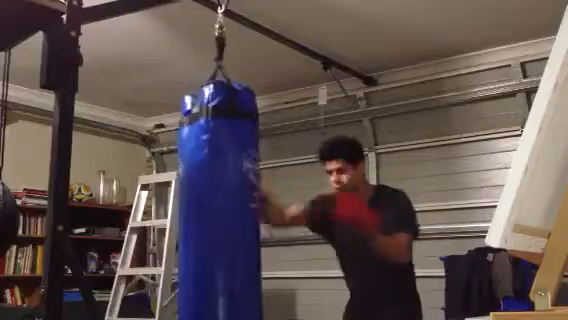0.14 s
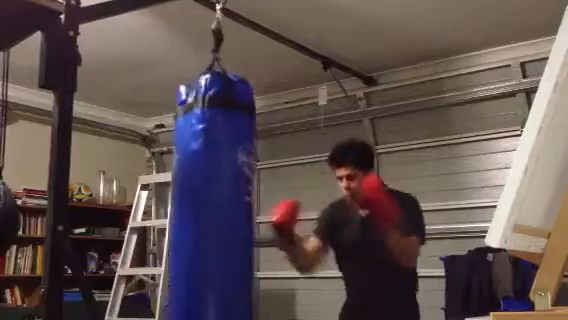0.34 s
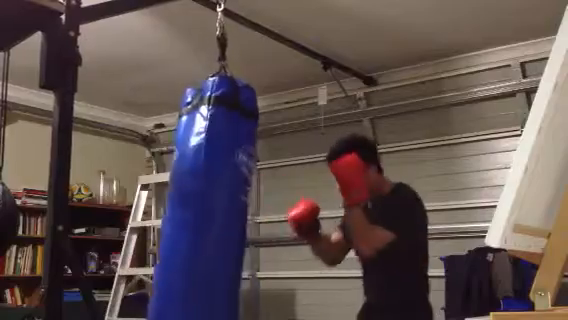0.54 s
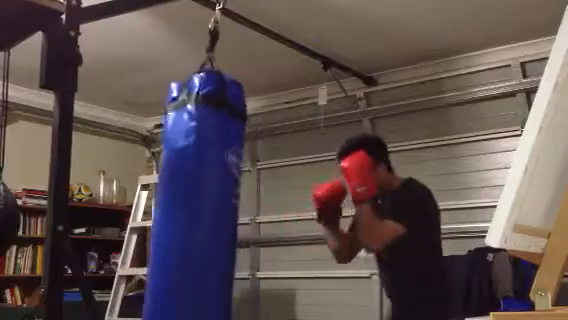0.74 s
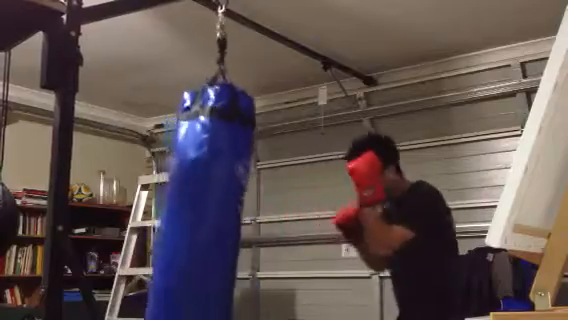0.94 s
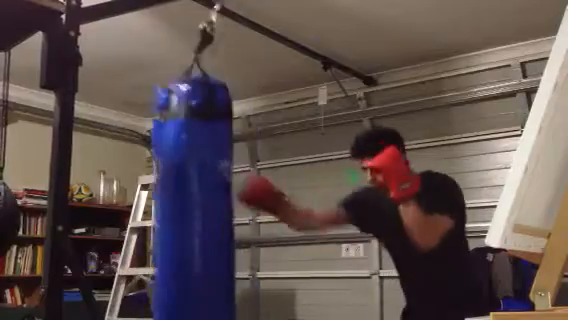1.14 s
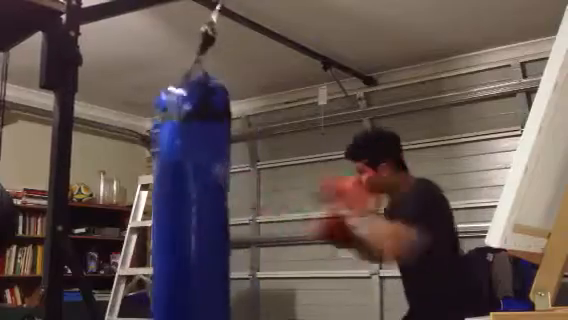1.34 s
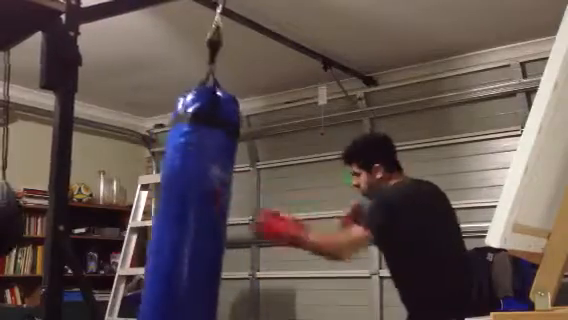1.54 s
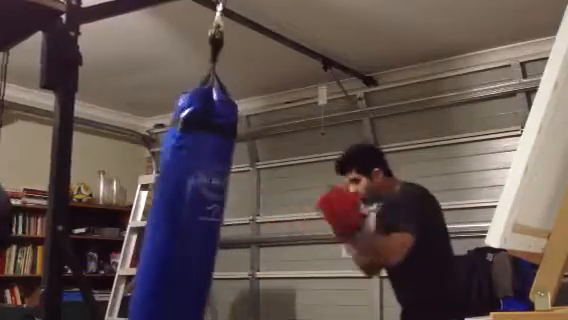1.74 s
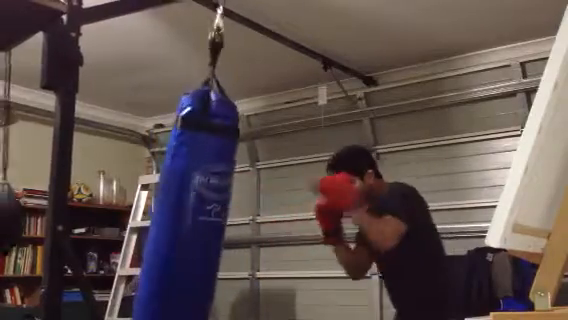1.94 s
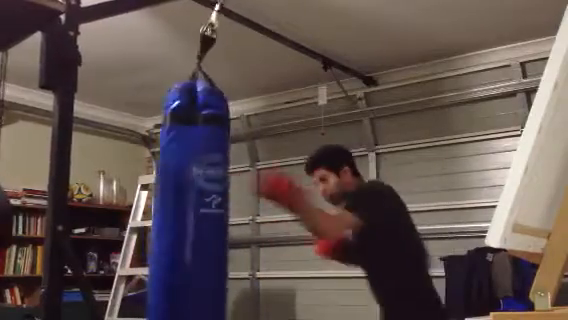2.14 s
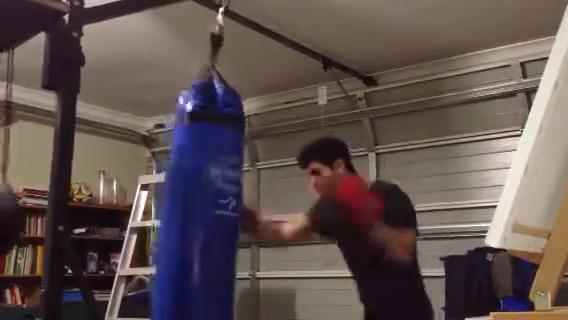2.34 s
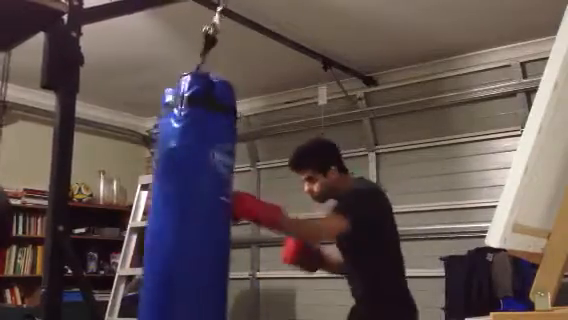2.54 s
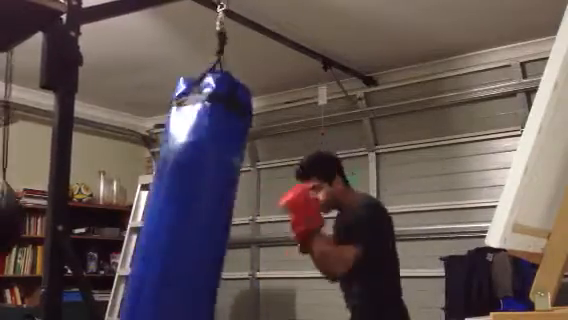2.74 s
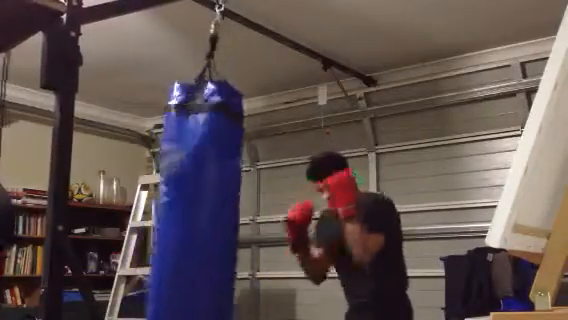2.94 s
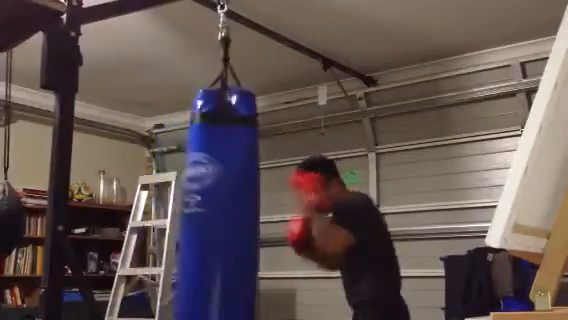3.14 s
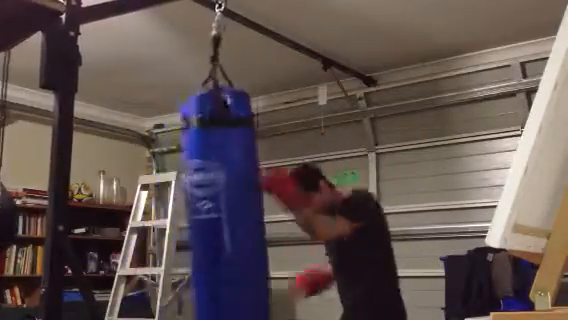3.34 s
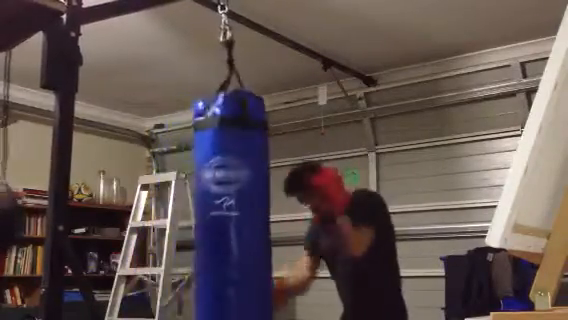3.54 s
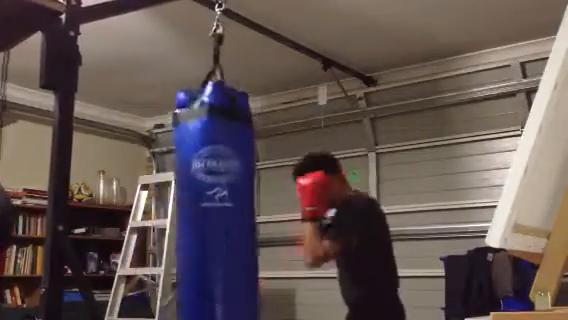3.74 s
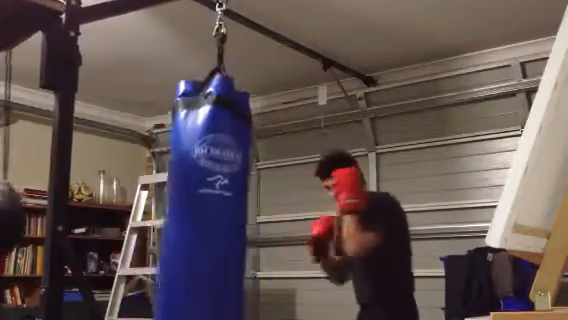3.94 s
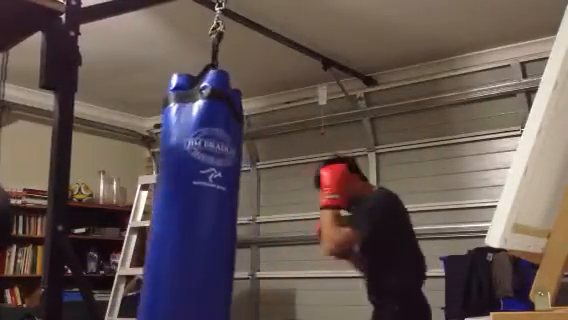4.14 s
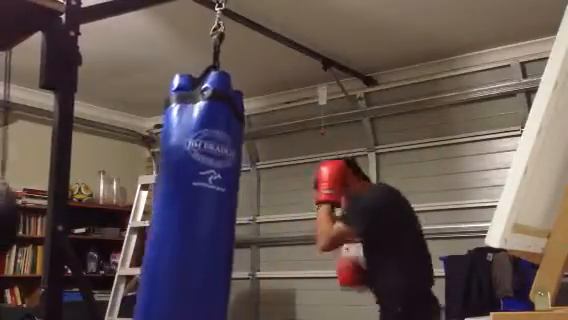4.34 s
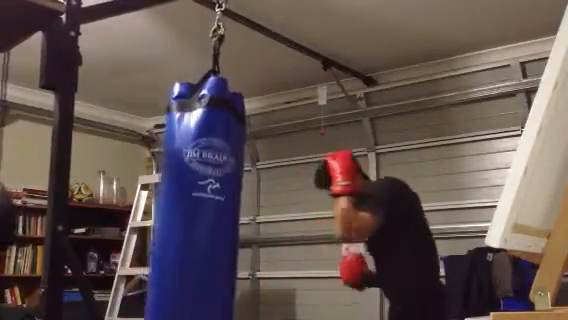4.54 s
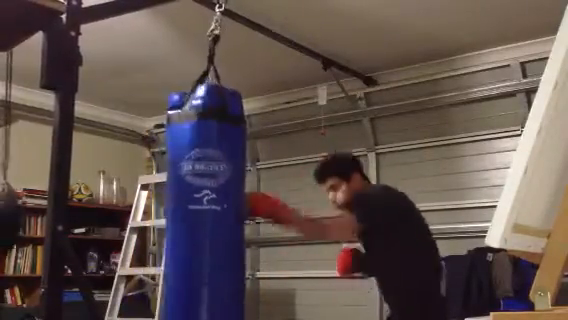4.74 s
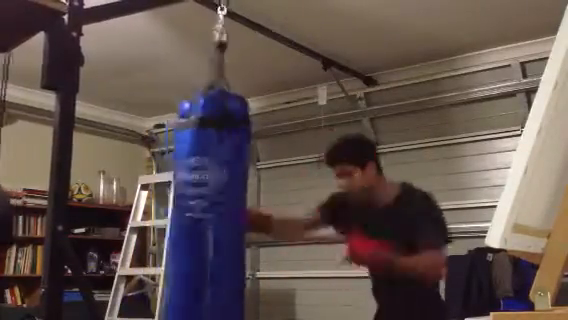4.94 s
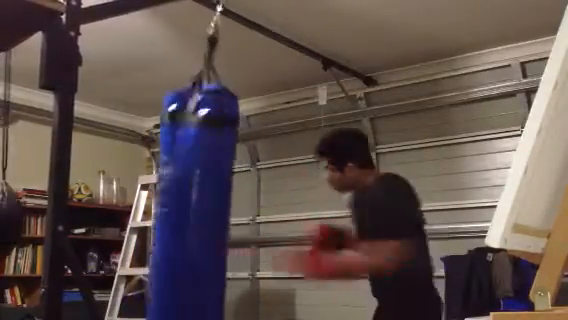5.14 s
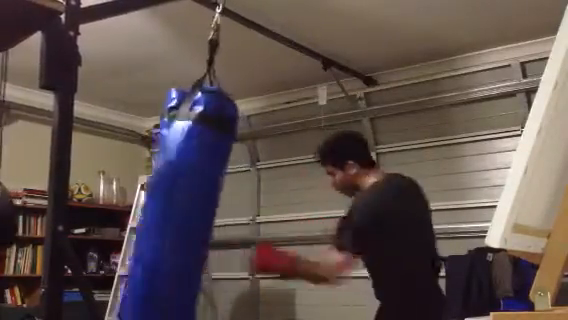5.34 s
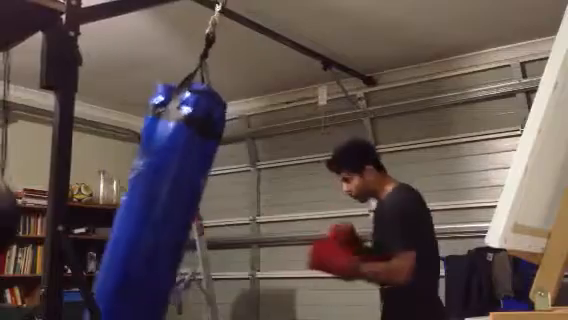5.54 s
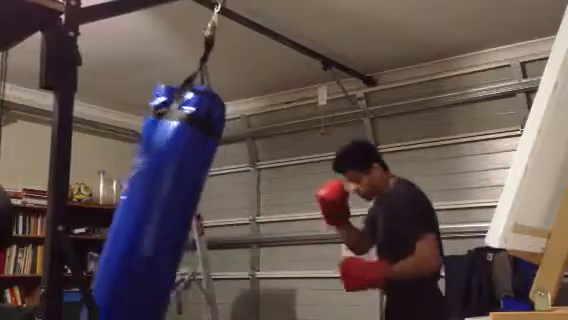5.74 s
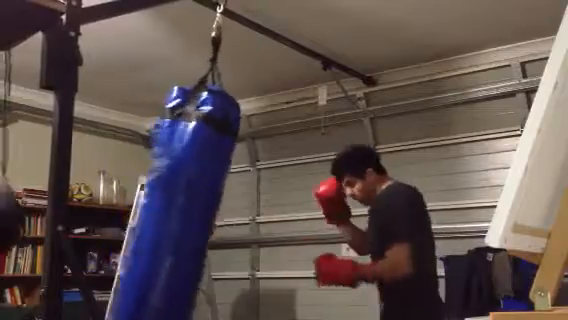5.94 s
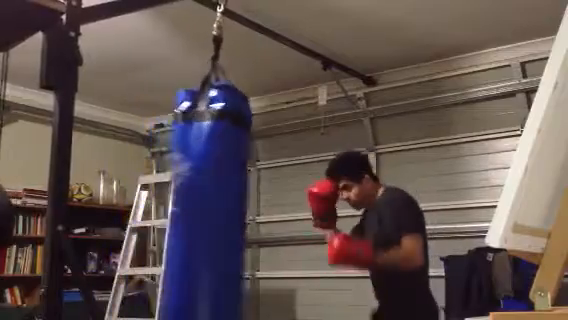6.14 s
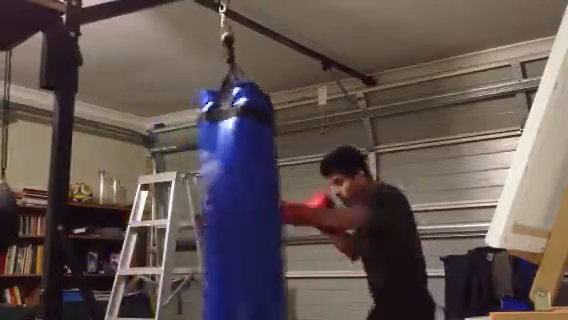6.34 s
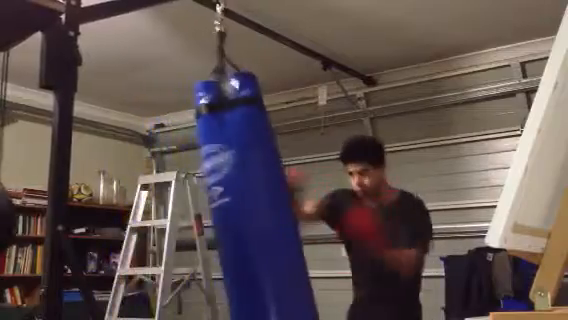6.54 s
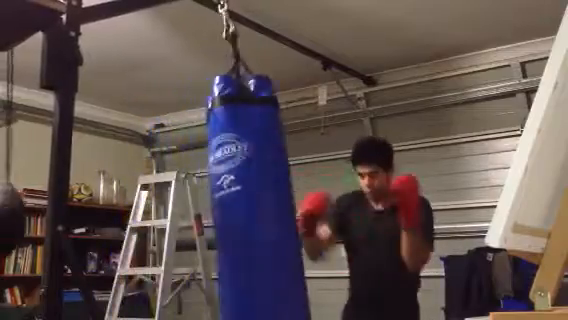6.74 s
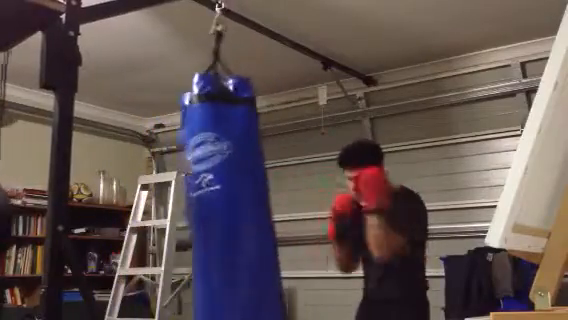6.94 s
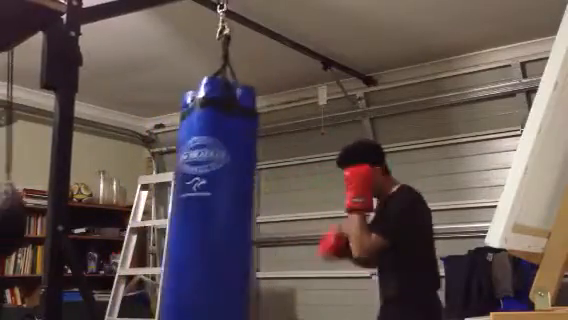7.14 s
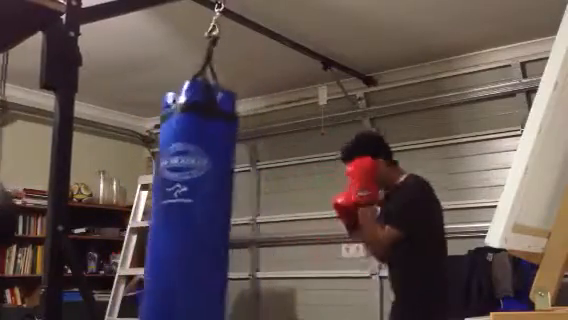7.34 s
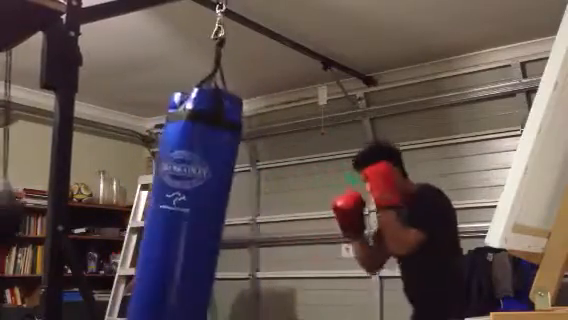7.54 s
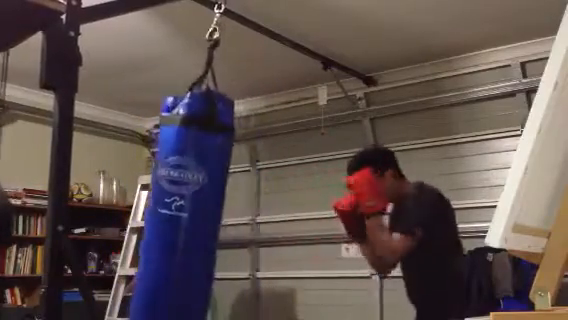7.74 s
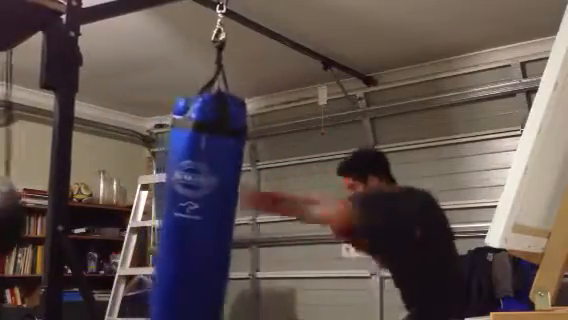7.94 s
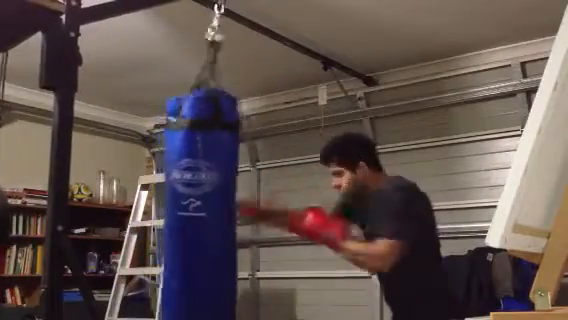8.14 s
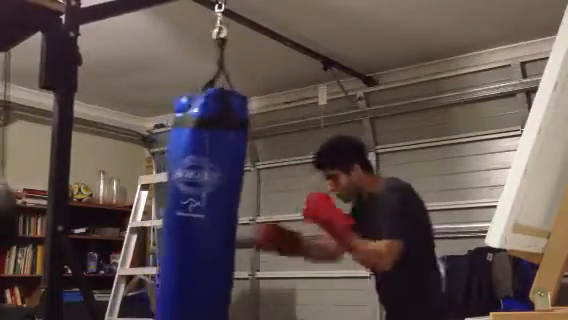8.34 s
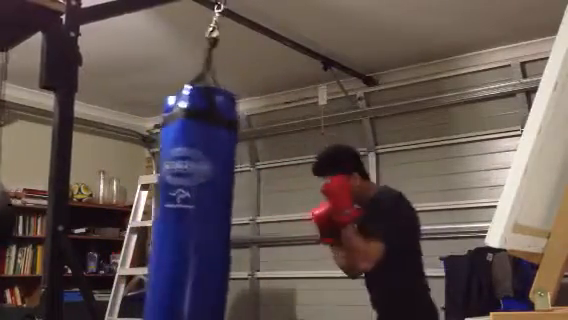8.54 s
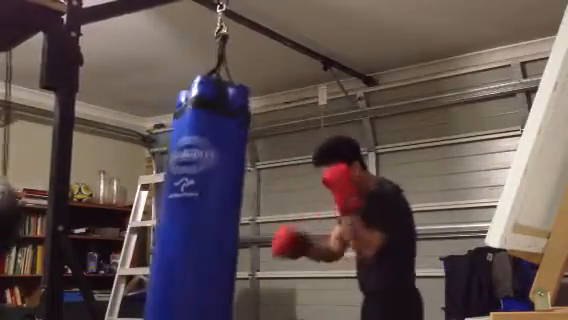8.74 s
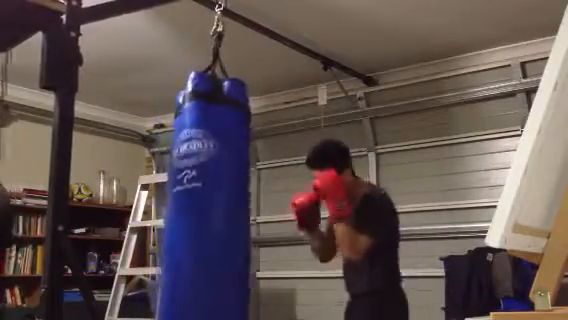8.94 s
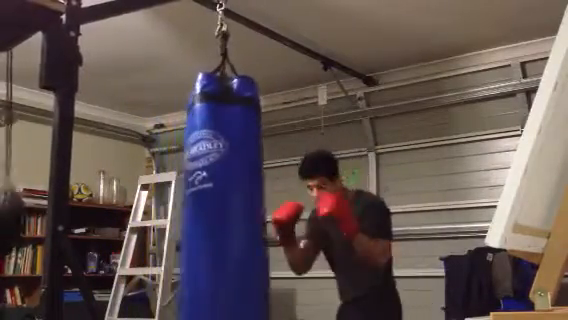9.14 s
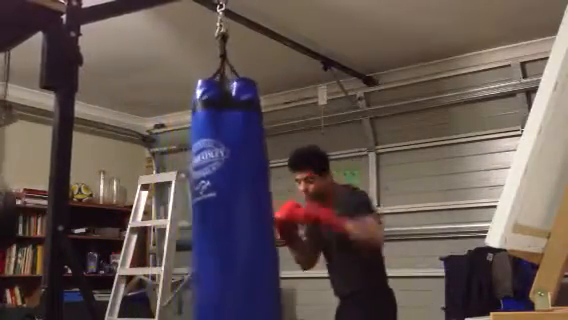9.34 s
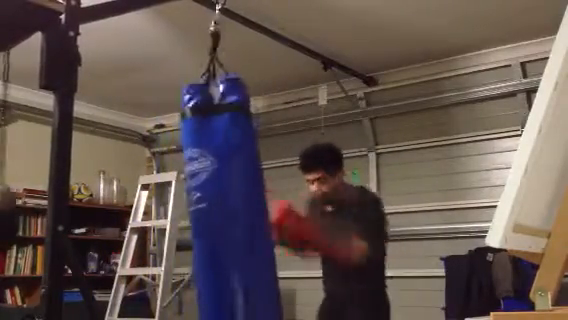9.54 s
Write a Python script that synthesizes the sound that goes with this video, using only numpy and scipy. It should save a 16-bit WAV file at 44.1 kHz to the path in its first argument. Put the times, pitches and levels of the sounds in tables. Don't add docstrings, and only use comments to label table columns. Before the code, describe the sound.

Padded gloves thud into a heavy hanging bag in short flurries, its steel chain jerking and clattering, shoes shuffling between blows in a hard-walled garage.

```python
import sys
import numpy as np
from scipy import signal
from scipy.fft import rfft, irfft
from scipy.io import wavfile
from scipy.ndimage import uniform_filter1d

SR = 44100
rng = np.random.default_rng(int(sys.argv[2]) if len(sys.argv) > 2 else 0)


def transcribe(u):
    v = np.clip(np.atleast_2d(u).T, -1, 1)
    q = np.round(v * 32767).astype(np.int16)
    wavfile.write(sys.argv[1], SR, q)


def rack_gain(trim_db):
    fader = np.asarray(trim_db, float)
    return 10 ** (fader / 20)


N = 422919
SIZE = 2 ** 15
HZ, T = np.fft.rfftfreq(SIZE, 1 / SR), np.arange(SIZE) / SR

# pitch_hz, level_db
MIC = [(25, -26), (50, -21), (100, -0.5), (170, 12), (480, 0.5), (1000, 3.5), (2300, 1.5), (4900, 6.5),
       (5800, 3), (8500, 3), (10500, -2), (13000, 1), (15200, -6.5), (15600, -37.5)]
# pitch_hz, t60_s
WALLS = [(100, 0.17), (300, 0.59), (1000, 0.67), (3000, 0.54), (7000, 0.44), (14000, 0.28)]
# pitch_hz, density_db (per Hz)
AIR = [(24, -82.5), (40, -53), (64, -36), (85, -19), (118, -16.5), (176, -0.5), (363, -5.5), (433, -20),
       (810, -18), (2150, -23.5), (4130, -23.5), (5870, -23.5), (14800, -33), (16000, -55.5)]
# time_s, rustle_db (over the still room)
MOVE = [(0, 41), (.45, 25), (.77, 13.5), (1.1, 25), (3.0, 30), (3.8, 14.5), (4.25, 7), (4.45, 28), (4.6, 1),
        (4.8, 38), (5.6, 22.5), (6.28, 10), (6.9, 28), (7.5, 20.5), (7.95, 16.5), (8.57, 23.5), (9.3, 13.5),
        (9.59, 42)]
# start_s, pitch_hz, level_db
SING = [
    (.2, 1351, -56),
    (.2, 1930, -56),
    (.2, 2420, -56),
    (.65, 2460, -63),
    (1.75, 2200, -47),
    (2.83, 1340, -53),
    (2.83, 2218, -55),
    (5.29, 4160, -49),
    (6.64, 1344, -50),
    (8.22, 1330, -55),
]
# start_s, pitch_hz, level_db
CLINK = [(1.26, 2148, -26), (4.83, 3650, -44), (4.83, 918, -40), (5.08, 2920, -35), (5.58, 2660, -50.5),
         (6.236, 2250, -45), (6.236, 2090, -41), (6.236, 2440, -32.5), (6.237, 2680, -38.5),
         (6.236, 3060, -54), (6.236, 3660, -48), (6.236, 4700, -51), (6.235, 317, -47), (5.58, 3940, -53),
         (5.58, 5950, -60), (6.64, 4240, -33.5), (6.799, 1100, -59), (4.46, 934, -56), (8.327, 1028, -43)]
# start_s, pitch_hz, level_db
JANGLE = [(0.031, 3290, -38.5), (.202, 4760, -40.5), (1.254, 4380, -24.5), (1.5, 3630, -34),
          (1.746, 4200, -24), (1.84, 5210, -32.5), (2.161, 1316, -35.5), (2.359, 3940, -24),
          (2.46, 4080, -30), (2.701, 4470, -34), (4.2, 1104, -45.5), (5.081, 5080, -27), (5.58, 4150, -53),
          (6.235, 2440, -37), (8.02, 1000, -38), (9.31, 1384, -50.5), (9.049, 594, -52)]
# start_s, body_db, scuff_db, slide_spread_s
SHOES = [(0.4312, -41.5, -57.5, 0.035), (0.6527, -38, -51, 0.0033), (0.747, -46.5, -51.5, 0.0042),
         (0.899, -43.5, -69, 0.0034), (3.751, -66, -48.5, .011), (3.9397, -49.5, -55.5, 0.0097),
         (4.0367, -60, -58.5, .015), (4.2077, -44.5, -51.5, 0.0045), (4.4594, -43, -50, 0.034),
         (4.6194, -71, -53, .0077), (5.5742, -38, -39.5, 0.0053), (5.7471, -40.5, -51, 0.0067),
         (5.8544, -48.5, -49, .0063), (6.052, -42, -54, 0.0033), (6.9816, -70, -48.5, .012),
         (7.208, -48, -45, 0.0033), (7.4297, -46, -50, 0.01), (8.7815, -40, -47.5, .012),
         (9.1196, -75, -54.5, .011), (9.2759, -54, -49, .036)]
# middle_s, pitch_hz, level_db, length_s
SQUEAK = [(0.439, 1076, -40.5, 0.042), (1.365, 1086, -28.5, 0.03), (1.715, 1220, -40.5, 0.048),
          (2.795, 1096, -32, 0.036), (5.091, 947, -20, 0.045), (5.098, 696, -23, 0.036),
          (5.164, 1070, -27.5, 0.042), (6.496, 1097, -37, 0.085), (7.002, 1106, -48, 0.074),
          (8.351, 1058, -33, .04), (8.35, 694, -31, 0.029), (8.44, 1390, -47, .04), (4.676, 315, -55, 0.06)]
# start_s, body_db, clatter_db, sizzle_db, rattle_spread_s
CHAIN = [(0.218, -27, -31.5, -32, 0.0069), (1.2498, -19, -12, -12, 0.0072),
         (1.498, -24.5, -24, -20, 0.0068), (1.7424, -19, -11, -7, 0.014), (1.8377, -26, -17, -17.5, .004),
         (2.3549, -17.5, -13, -10.5, 0.0083), (2.4205, -26, -17, -11.5, .006),
         (2.4558, -19, -11.5, -10, 0.013), (2.6981, -27, -27.5, -16, 0.0038),
         (2.823, -22, -13.5, -7, .0043), (3.4764, -27, -24, -21, .0022), (4.8274, -38, -35.5, -29.5, 0.014),
         (5.006, -45, -20.5, -17, 0.0077), (5.0661, -13, -16, -32, 0.014),
         (5.1014, -33, -16.5, -12.5, 0.0086), (5.1311, -54, -18, -18.5, 0.0015),
         (5.2756, -26, -21, -14, 0.0094), (6.235, -34.5, -36.5, -41.5, 0.0014),
         (6.52, -27.5, -40.5, -46, 0.0017), (6.5696, -31, -32, -35.5, 0.022),
         (6.6305, -27, -18.5, -12, 0.0092), (8.1044, -28.5, -19.5, -12.5, 0.0078),
         (8.2401, -42, -27.5, -21, .004), (8.3232, -28.5, -39, -47, 0.0012)]
# pitch_hz, level_db, t60_s
LINKS = [(1150, -5, .015), (2150, -3, .015), (2850, -3, .015), (3600, 0, .012), (4300, 0, .012),
         (5000, 0, .012), (6500, -1, .012), (7400, -1, .012), (9200, -1, .012), (12000, -2, .012)]
# centre_hz, width_hz
CHAIN_HZ = [(450, 400), (1400, 1300), (3900, 3500), (10000, 8000)]
# start_s, thud_db, body_db, slap_db, crack_db (over the slap; flat hits crack, glancing do not)
PUNCH = [(.001, -28, -37, -31, -3), (.2, -22.5, -30.5, -35, 7), (1.1275, -22.5, -26.5, -29.5, 9.5),
         (1.4495, -21.5, -30.5, -27, 14.5), (2.1009, -29.5, -29.5, -31, 8.5), (2.324, -21, -26.5, -24.5, 2),
         (2.5204, -25, -25.5, -30, 5), (3.2799, -33, -36.5, -45, 2), (3.4587, -17, -22, -25, 6.5),
         (4.7387, -27.5, -30, -33.5, 5.5), (4.974, -18.5, -23, -22.5, 4.5), (5.252, -20, -28, -27.5, 17.5),
         (6.3671, -32, -31.5, -41.5, 7.5), (6.5982, -25, -27, -26.5, 0), (8.0107, -30, -27, -32.5, 11),
         (8.2087, -22.5, -24.5, -29.5, 12.5), (9.4569, -24.5, -26.5, -31.5, 5.5)]
# pitch_hz, level_db, t60_s
BAG = [(97.6, -20.5, 0.85), (146.4, -13, 0.16), (197.8, -3.5, 0.22), (233.8, -7, 0.25), (269.2, -9.5, 0.38),
       (308, -12.5, .2)]
# centre_hz, width_hz
PUNCH_HZ = [(200, 230), (900, 1000), (3500, 4000), (10000, 8000)]


def unit(x):
    return x / np.sqrt(np.mean(x ** 2, axis=-1, keepdims=True) + 1e-20)


def along(points, hz):
    f, v = np.transpose(points)
    return np.interp(np.log(hz + 1), np.log(f + 1), v)


def causal(db):
    cepstrum = irfft(db * np.log(10) / 20)
    cepstrum[..., 1:SIZE // 2] *= 2
    cepstrum[..., SIZE // 2 + 1:] = 0
    return np.exp(rfft(cepstrum))


def colour(levels, bands, bass_db):
    centre, width = np.transpose(bands)
    doubled = [0, 0, 1, 2, 3]
    density = np.transpose(levels)[:, doubled] - 10 * np.log10(width[doubled] / 1000)
    density = density + [bass_db, 0, 0, 0, 0]
    points_hz = np.r_[centre[0] / 4, centre]
    return causal(np.array([along(np.c_[points_hz, d], HZ) for d in density]))


def contacts(spread, spiky_db, lead):
    u = T[:SIZE // 4] / np.clip(spread, .0003, .02)
    spikes = rack_gain(spiky_db * np.minimum(rng.exponential(size=u.shape), 3))
    impacts = spikes * rng.standard_normal(u.shape)
    return rfft(unit(impacts * (u + lead) * np.exp(-u)), SIZE) / np.sqrt(SIZE / 4)


def rings(modes, count, scatter_db, detune):
    out = np.zeros((count, len(HZ)), complex)
    step = np.exp(-2j * np.pi * HZ / SR)
    for hz, db, t60 in modes:
        luck = rng.standard_normal((count, 2))
        pitch_hz = hz * (1 + detune * luck[:, :1])
        pole = np.exp(2j * np.pi * pitch_hz / SR - np.log(1000) / (t60 * SR))
        resonance = pole.imag * step / ((1 - pole * step) * (1 - pole.conj() * step))
        out += rack_gain(db + scatter_db * luck[:, 1:]) * resonance
    return out


def garage(build, wet_db, gap=0.011, clump_db=-1.5):
    hz, t, z = signal.stft(rng.standard_normal((len(build), SIZE)), SR, nperseg=256)
    lumps = clump_db * rng.standard_normal((len(build), 9, len(t)))
    lumps = lumps.repeat(15, axis=1)[:, :len(hz)]
    decay_db = 60 * t / along(WALLS, hz)[:, None]
    tail = signal.istft(z * rack_gain(lumps - decay_db), SR, nperseg=256)[1][:, :SIZE]
    late = np.clip(T - gap, 0, None) / np.clip(build, .0003, .2)
    return rack_gain(wet_db) * rfft(unit(tail * (1 - np.exp(-late)))) / np.sqrt(SIZE)


def place(rows, spectra):
    out = np.zeros(N + SIZE)
    fade = np.clip((T[-1] - T) / .2, 0, 1)
    for s, sound in zip(rows[:, 0], irfft(spectra, SIZE)):
        out[round(s * SR):][:SIZE] += sound * fade
    return out[:N]


def stir():
    hz, t, z = signal.stft(rng.standard_normal(N), SR, nperseg=512)
    field = uniform_filter1d(rng.standard_normal(z.shape), 5, axis=0)
    field = uniform_filter1d(field, 9, axis=1)
    move_db = np.interp(t, *np.transpose(MOVE))
    s, _, body_db, *_ = np.transpose(PUNCH)
    # dB per dB of movement, time to the sway's peak (s), sway over blow's body, still room
    ranges = [(0.32, 0.079, 43.5, 5.5), (0.98, 0.059, 68.5, 5), (0.53, 0.041, 63, 5.5)]
    swell = []
    for grows, peak_s, sway_db, still_db in ranges:
        u = np.clip(t[:, None] - s, 0, None) / peak_s
        sway = u * np.exp(1 - u) @ rack_gain(body_db + sway_db)
        power = rack_gain(2 * still_db) + rack_gain(2 * grows * move_db) + sway ** 2
        swell.append(10 * np.log10(power))
    gain_db = np.array([along(np.c_[[220, 1000, 6000], col], hz) for col in np.transpose(swell)]).T
    air_db = along(AIR, hz) - along(MIC, hz)
    patchy_db = np.clip(3.2 - hz / 1500, .8, 9)
    gain_db = gain_db + air_db[:, None] + patchy_db[:, None] * field / field.std()
    return rack_gain(-48.0) * signal.istft(z * rack_gain(gain_db), SR, nperseg=512)[1][:N]


def shoes():
    rows = np.array(SHOES)
    body_db, scuff_db = rows.T[1:3]
    spread = rows[:, 3:]
    scuff = contacts(spread, spiky_db=4.5, lead=0.97) + garage(0.45 * spread, wet_db=3.0)
    levels = [body_db - 9.5, body_db, scuff_db, scuff_db - 2]
    return place(rows, rack_gain(29.5) * scuff * colour(levels, PUNCH_HZ, bass_db=-5.5))


def squeaks():
    rows = np.array(SQUEAK)
    pitch_hz, level_db, length = rows[:, 1:2], rows[:, 2:3], rows[:, 3:]
    waver = unit(uniform_filter1d(rng.standard_normal((len(rows), SIZE)), 120, axis=1))
    glide = np.tanh(T / length - .4)
    phase = 2 * np.pi * np.cumsum(pitch_hz * (1 + 0.046 * waver + 0.021 * glide), axis=1) / SR
    u = 4 * T / length
    tone = rack_gain(level_db + 7) * u * np.exp(-u) * (np.sin(phase) + 0.089 * np.sin(2 * phase))
    return place(rows - length / 2, rfft(tone) * (1 + garage(length / 10, wet_db=-9)))


def beam():
    out, t = np.zeros(N + SR), np.arange(SR) / SR
    # table, width of a partial (Hz), t60 at 1 kHz (s), how t60 shortens with pitch (power)
    kinds = [(SING, 30, 2.5, .7), (CLINK, 150, .5, .15), (JANGLE, 800, .33, .05)]
    for table, blur_hz, ring_s, falls in kinds:
        for s, hz, db in table:
            t60 = ring_s * (1000 / hz) ** falls
            knots = rng.standard_normal((2, 1200))
            wander = np.interp(blur_hz * t, np.arange(1200), knots[0] + 1j * knots[1])
            beat = 14 / blur_hz + wander
            level = rack_gain(db - 60 * t / t60) * (1 - np.exp(-t / 0.0033)) * (1 - t ** 4)
            out[round(s * SR):][:SR] += level * (beat * np.exp(2j * np.pi * hz * t)).imag
    return out[:N]


def chain():
    rows = np.array(CHAIN)
    body_db, clatter_db, sizzle_db = rows.T[1:4]
    spread = rows[:, 4:]
    knocks = contacts(spread, spiky_db=4.5, lead=0.19) + garage(0.93 * spread, wet_db=2, gap=0.0029)
    steel = 1 + rack_gain(-39) * rings(LINKS, len(rows), scatter_db=3.0, detune=0.071)
    levels = [body_db - 11.5, body_db, clatter_db, sizzle_db]
    return place(rows, rack_gain(29.0) * knocks * steel * colour(levels, CHAIN_HZ, bass_db=-12.0))


def punches():
    rows = np.array(PUNCH)
    thud_db, body_db, slap_db = rows.T[1:4]
    touch = np.full((len(rows), 1), .0005)
    bright = 1j * HZ / (600 + 1j * HZ)
    bounce = 1 + 1.03 * np.exp(-2j * np.pi * HZ * 0.0041) / (1 + 1j * HZ / 8000)
    snap = contacts(touch, spiky_db=6.5, lead=.6) - rack_gain(-17.0)
    crack = rack_gain(rows[:, 4:] - 4.5) * bright * bounce * snap
    slap = crack - rack_gain(-13.0) + garage(8 * touch, wet_db=10, gap=0.0014)
    boom = -rack_gain(rows[:, 1:2] - 13.5) * rings(BAG, len(rows), scatter_db=0.9, detune=0.017)
    levels = [thud_db - 3, body_db, slap_db, slap_db + 3.4]
    sound = rack_gain(25) * slap * colour(levels, PUNCH_HZ, bass_db=0.0)
    sound = sound + boom * (2.5 + garage(touch, wet_db=-10.5))
    return place(rows + .0006, sound)


def scene():
    return (stir() + shoes() + squeaks() + beam() + chain() + punches())[None]


def top_cut(x):
    return signal.sosfilt(signal.butter(12, 16490, fs=SR, output="sos"), x)


def record(dry):
    microphone = irfft(causal(along(MIC, HZ)))[None, :4096]
    x = signal.fftconvolve(dry, microphone, axes=1)[:, :N]
    x = x / (1 + np.abs(x / .6) ** 6) ** (1 / 6)
    band_limit = irfft(causal(-15.5 * (HZ > 15500)))[None, :512]
    x = signal.fftconvolve(x, band_limit, axes=1)[:, :N]
    return top_cut(x)


dry = scene()
out = record(dry)
transcribe(out)
```